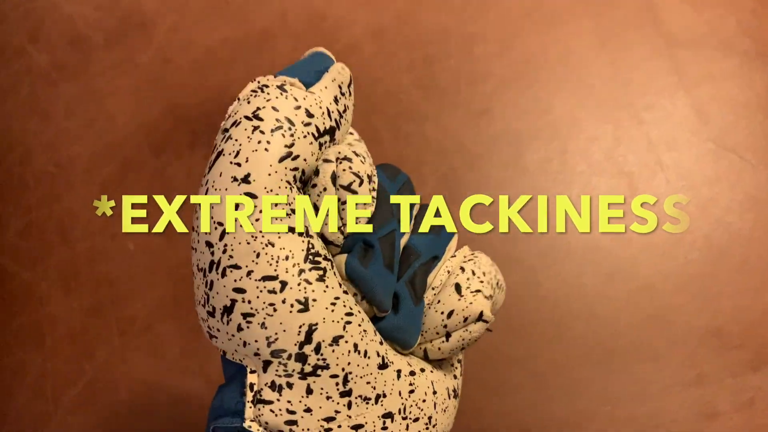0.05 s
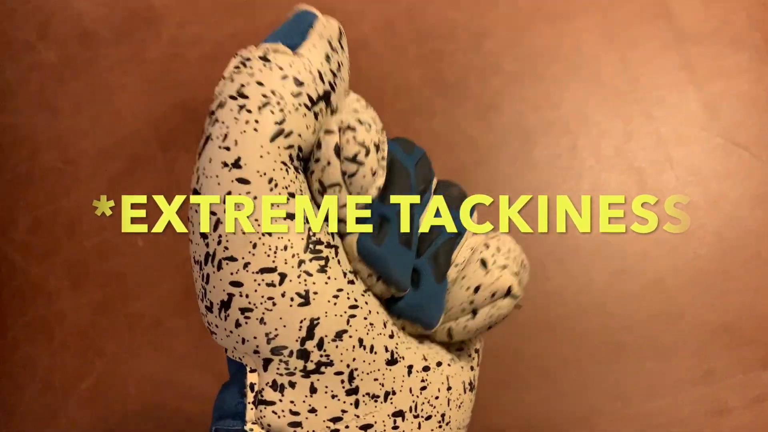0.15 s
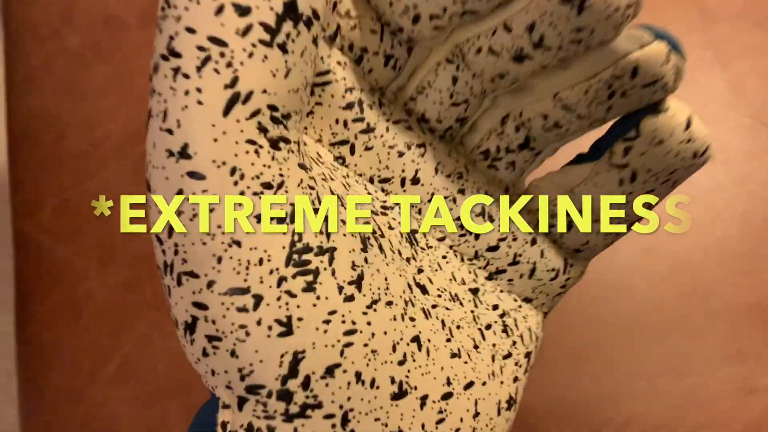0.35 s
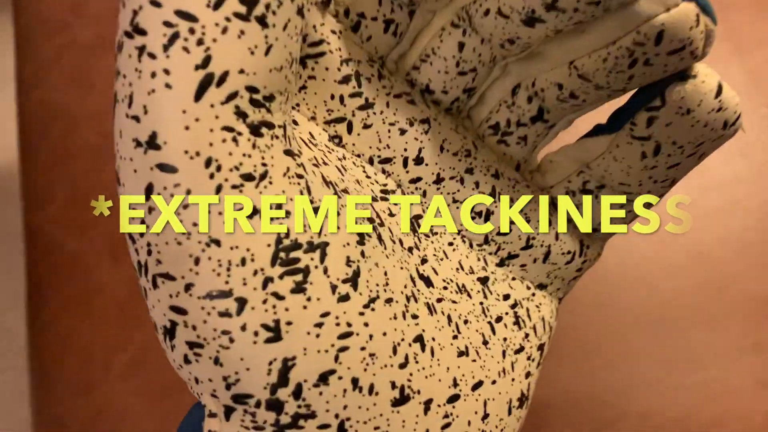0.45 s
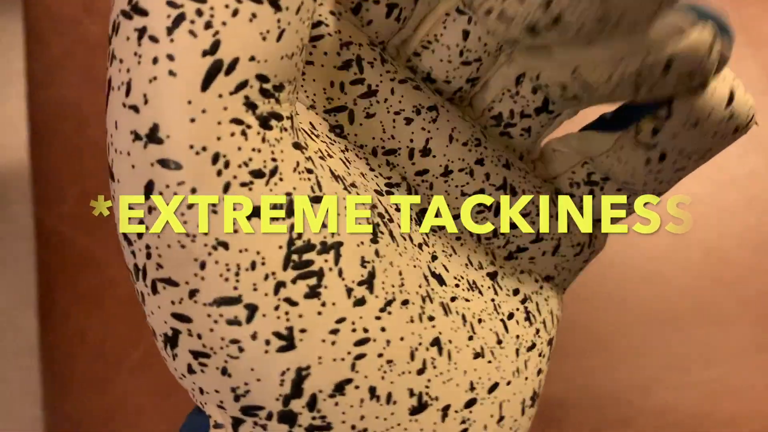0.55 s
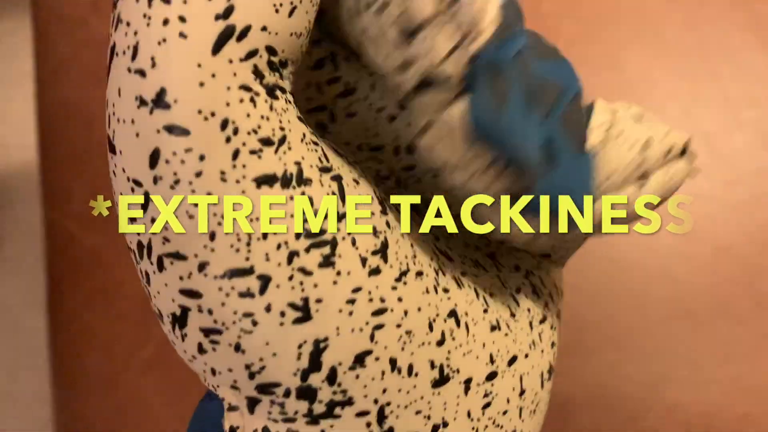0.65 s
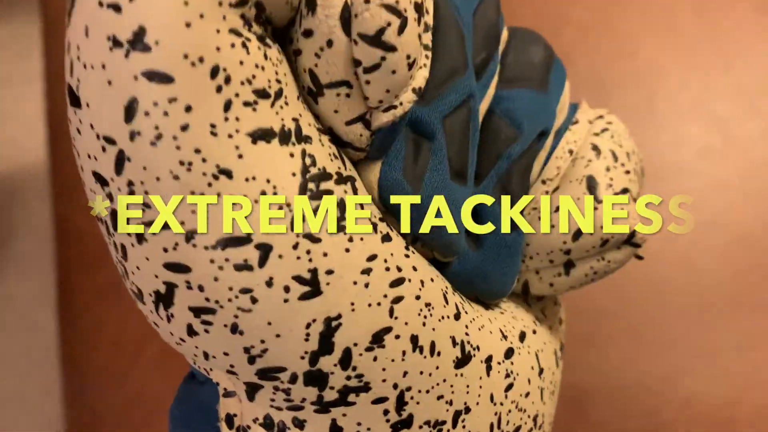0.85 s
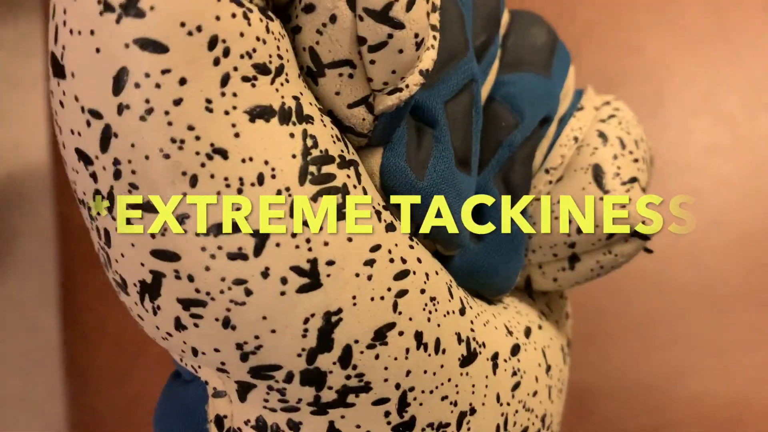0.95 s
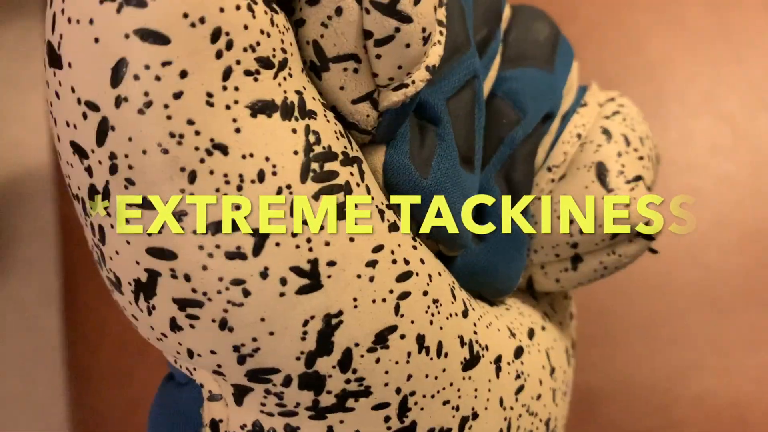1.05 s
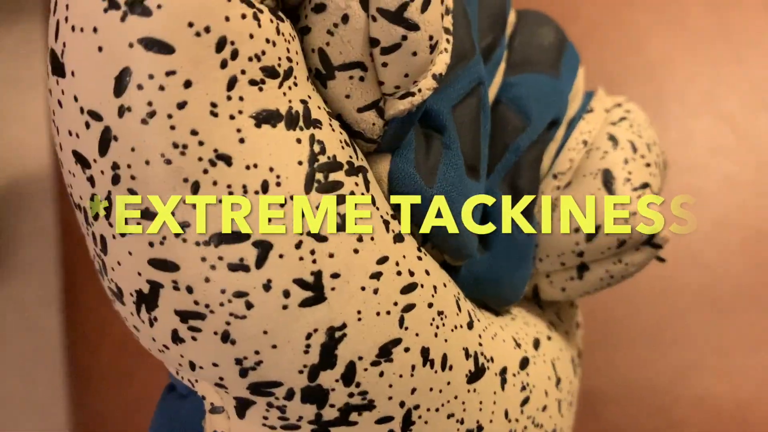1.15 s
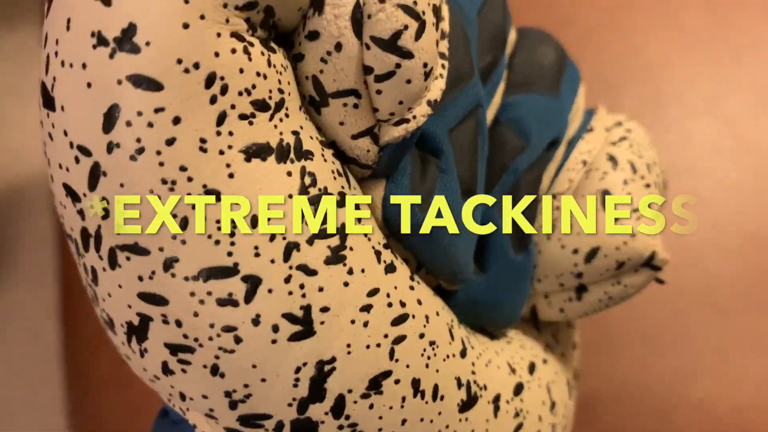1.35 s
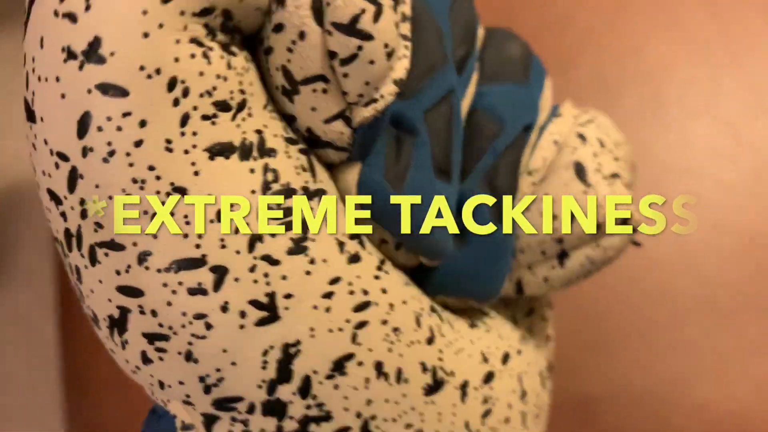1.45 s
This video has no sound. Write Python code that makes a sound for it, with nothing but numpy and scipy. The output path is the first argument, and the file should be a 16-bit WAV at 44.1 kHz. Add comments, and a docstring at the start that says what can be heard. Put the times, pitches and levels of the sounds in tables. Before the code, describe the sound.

Sticky crackling and tiny pops as a gloved hand opens, then closes with a faint rustle.

```python
"""A quiet room, with a pair of microphones close to a tacky latex glove that opens and closes.
The palm peels apart in a fine crackle of breaking bonds and ends in a run of snaps, while small
air pockets pop with a falling pitch. The fist closes with a soft rustle, ticks once while it is
held, and begins to peel again. Under it lie a low rumble from the hand, room hum and microphone hiss."""
import sys
import numpy as np
from scipy import signal
from scipy.fft import rfft, irfft
from scipy.io import wavfile

SR = 44100
rng = np.random.default_rng(int(sys.argv[2]) if len(sys.argv) > 2 else 0)


def bounce(signal):
    """Save signal as a 16-bit WAV file at the path given by the first command-line argument."""
    frames = np.transpose(np.atleast_2d(signal))
    limited = np.clip(frames, -1, 1)
    pcm = np.round(limited * 32767).astype(np.int16)
    wavfile.write(sys.argv[1], SR, pcm)


N = 66150
T = np.arange(N) / SR
FFT_SIZE = 2 * N
HZ = np.maximum(np.arange(N + 1) * SR / FFT_SIZE, 1)

# The three moves of the hand. Each row: time in seconds, rustle level in dB, fizz level in dB.
PALM_PEELS = [(0, -96, -85), (0.128, -78.5, -72), (0.159, -58, -61.5), (0.183, -46, -49),
              (0.201, -49.5, -46.5), (0.211, -35, -35.5), (0.231, -33.5, -41.5), (0.251, -41, -47.5),
              (.28, -49.5, -49.5), (0.304, -51.5, -54.5), (.335, -52.5, -55), (.355, -66.5, -65.5),
              (0.402, -56.5, -66.5), (0.439, -89, -86.5)]
FIST_CLOSES = [(.48, -78, -86), (0.504, -63.5, -67), (0.519, -51.5, -64), (.545, -68.5, -69.5),
               (.635, -58, -68), (0.748, -58.5, -60), (.81, -68.5, -71.5), (.88, -82.5, -71.5),
               (1.0, -99, -85)]
PALM_REOPENS = [(1.385, -83.5, -80), (1.413, -68, -68), (1.459, -62.5, -57), (1.476, -52, -54),
                (1.493, -44.5, -39), (1.5, -41.5, -42)]
# Tone of the dull rustle and the bright fizz. Each row: frequency in Hz, relative level in dB.
RUSTLE_SPECTRUM = [(60, -13), (200, -10), (420, -9), (600, -9.5), (850, -0.5), (1400, 1), (2400, -4),
                   (3000, -11), (5000, -25), (12000, -42)]
FIZZ_SPECTRUM = [(1200, -25), (3000, -1), (4600, 0.5), (6300, -2), (7400, 1), (8700, -1), (11000, -3),
                 (13200, -5.5), (14500, -15), (16000, -21)]
# Air pockets opening. Each row: start in seconds, peak in dB, first pitch in Hz,
# growth of the period in seconds per second, swell time in seconds.
AIR_POCKETS = [(0.1924, -36.5, 1536, .16, 0.0017), (.2125, -32, 863, .03, 0.0021),
               (.2203, -19.5, 1916, 0.078, 0.00051), (.2222, -15.5, 1450, 0.33, 0.00044),
               (0.2236, -26, 800, 0.44, 0.0047), (.2298, -25.5, 1000, .05, .0009),
               (0.2417, -17, 1350, 0.22, 0.00044), (0.259, -38, 1214, 0.013, 0.00067),
               (0.2962, -27.5, 2000, 0.41, 0.00058), (0.3654, -40, 2000, 0.13, 0.00029),
               (.367, -51, 545, 0.054, 0.0021), (0.5031, -47.5, 1000, 0.06, .001),
               (0.5241, -26.5, 1600, 0.61, 0.0011), (.6985, -44, 524, 0.3, 0.0028)]
# Tacky spots letting go. Each row: start in seconds, level in dB, decay in seconds,
# lower and upper band edge in Hz.
TACKY_SPOTS = [(.0468, -44.5, 0.00093, 1850, 16000), (0.1922, -29, 0.0013, 1090, 11700),
               (0.21, -49, 0.00038, 1400, 12430), (.2203, -20, .001, 1395, 12000),
               (.2210, -21, 0.0018, 1690, 2900), (.2220, -14.5, 0.00084, 4260, 13100),
               (.2260, -19.5, .0004, 4240, 13500), (0.2581, -28.5, .0009, 4300, 12700),
               (.269, -30.5, .0003, 2000, 12640), (0.2985, -38, 0.00083, 1110, 4850),
               (0.3263, -33.5, 0.0007, 2500, 14700), (0.3658, -42, 0.00046, 1390, 9050),
               (0.5236, -34, 0.00025, 1390, 8750), (1.1027, -24.5, 0.00017, 6700, 11800),
               (1.103, -46.5, 0.0016, 1180, 6500), (1.413, -49, 0.0011, 1200, 4000),
               (1.4746, -38.5, .0012, 1100, 9500)]
# Rumble of the moving hand. Each row: time in seconds, level in dB.
HAND_RUMBLE = [(.21, -80), (.245, -49.5), (.3, -54), (.35, -69), (.5, -68), (.56, -55.5), (.62, -65.5),
               (.68, -53.5), (0.768, -58.5), (.85, -69)]
# Phase across the pair. Each row: frequency in Hz, lead of the left microphone in radians.
LEFT_LEAD = [(200, 0.5), (1000, 1.23), (2200, -1.3), (3300, -2), (4300, -2), (5200, -3.5), (7500, 1.55),
             (9500, -1.99), (11500, 4), (13500, 2), (15200, 8)]
# Balance across the pair. Each row: frequency in Hz, left minus right in dB.
LEFT_BALANCE = [(60, 0), (200, -3), (600, -3), (1300, 0.5), (2500, -8), (5000, 1.5), (12000, -0.5)]
# Wavering drones of the room. Each row: centre in Hz, half-width in Hz, level in dB.
ROOM_DRONES = [(55.1, 6.7, -61.5), (176.4, 6.8, -66.5), (491, 25, -74)]
# Room tone and each microphone's own hiss. Each row: frequency in Hz, gain on white noise in dB.
ROOM_TONE = [(20, -69.5), (50, -39), (90, -42), (180, -48.5), (300, -54), (420, -67.5), (800, -81),
             (2000, -79), (5000, -69), (10000, -66.5), (16000, -70.5)]
MICROPHONE_HISS = [(20, -72.5), (60, -55.5), (200, -51.5), (450, -59.5), (900, -67.5), (1600, -63.5),
                   (3000, -71), (4300, -70), (8000, -85), (16000, -87)]


def latex_crackle():
    """Tiny bonds break as the hand flexes: a dull rustle from the foam, a bright fizz from its skin."""
    times, rustle_db, fizz_db = np.transpose(PALM_PEELS + FIST_CLOSES + PALM_REOPENS)
    rustle = rms_one(colour(breaking_bonds(), RUSTLE_SPECTRUM))
    fizz = rms_one(colour(breaking_bonds(), FIZZ_SPECTRUM))
    return from_db(np.interp(T, times, rustle_db)) * rustle + from_db(np.interp(T, times, fizz_db)) * fizz


def breaking_bonds(clicks_per_s=8000, spread_db=3, clump_db=2.5, clump_s=0.002):
    """The bond gives way in patches, so dense clicks of uneven size come in clumps."""
    sizes = from_db(spread_db * np.minimum(rng.exponential(1, N), 4.43))
    signs = rng.choice([-1, 1], N)
    breaks = rng.random(N) < clicks_per_s / SR
    clumps = np.interp(T / clump_s, np.arange(N), rng.standard_normal(N))
    return sizes * signs * breaks * from_db(clump_db * clumps)


def air_pops():
    """Each air pocket rings as it opens; its period grows steadily, so the pitch drops."""
    out = np.zeros(N)
    for start, db, hz, growth, swell_s in AIR_POCKETS:
        age = np.maximum(T - start, 0)
        cycles = np.log1p(growth * hz * age) / growth
        envelope = age / swell_s * np.exp(1 - age / swell_s)
        out += from_db(db) * envelope * np.sin(2 * np.pi * cycles)
    return out


def tacky_snaps():
    """Each sticky spot tears free in a burst about a millisecond long."""
    out = np.zeros(N)
    for start, db, decay_s, low_hz, high_hz in TACKY_SPOTS:
        decays = (T - start) / decay_s
        envelope = (decays >= 0) * (decays < 4.2) * np.exp(-np.abs(decays))
        burst = rng.choice([-1, 1], N) * envelope
        snap = band(band(burst, low_hz, high_hz), low_hz, high_hz)
        burst_energy = decay_s * SR / 2
        out += from_db(db) * snap * np.sqrt(burst_energy / np.sum(snap ** 2))
    return out


def hand_rumble():
    """The moving hand makes a soft low rumble close to the microphones."""
    times, db = np.transpose(HAND_RUMBLE)
    rumble = band(rng.standard_normal(N), low_hz=42.8, high_hz=96)
    return from_db(np.interp(T, times, db)) * rms_one(rumble)


def reflections(x, db, t60_s, delay_s, low_hz, high_hz):
    """A dying spray of reflections, different at each microphone."""
    envelope = from_db(-60 * T / t60_s) * (T >= delay_s)
    tail = band(rng.standard_normal((2, N)) * envelope, low_hz, high_hz)
    response = rfft(rms_one(tail) / np.sqrt(N), FFT_SIZE)
    return from_db(db) * filtered(x, response)


def room_hum():
    """The room drones in narrow, wavering bands of low noise."""
    out = np.zeros(N)
    for hz, half_width, db in ROOM_DRONES:
        peak = 1 / (1 + ((HZ - hz) / half_width) ** 2)
        out += from_db(db) * rms_one(filtered(rng.standard_normal(FFT_SIZE), peak))
    return out


def microphone_pair(x):
    """The close pair hears one sound, with its own phase and level on each side."""
    sides = np.array([[.5], [-.5]])
    gain = from_db(sides * over_hz(LEFT_BALANCE))
    phase = sides * over_hz(LEFT_LEAD)
    return filtered(x, gain * np.exp(1j * phase))


def from_db(db):
    """Decibels to gain."""
    return 10 ** (np.asarray(db) / 20)


def rms_one(x):
    """Scale to rms 1."""
    return x / np.sqrt(np.mean(x ** 2) + 1e-20)


def over_hz(points):
    """Read a table along log frequency."""
    hz, value = np.transpose(points)
    return np.interp(np.log(HZ), np.log(hz), value)


def filtered(x, response):
    """Apply a frequency response."""
    return irfft(rfft(x, FFT_SIZE) * response, FFT_SIZE)[..., :N]


def colour(x, spectrum):
    """Causal (minimum-phase) filter with the given spectrum."""
    cepstrum = irfft(np.log(from_db(over_hz(spectrum))))
    fold = np.r_[1, np.full(N - 1, 2), 1, np.zeros(N - 1)]
    return filtered(x, np.exp(rfft(cepstrum * fold)))


def band(x, low_hz, high_hz):
    """Band-pass between two edges."""
    return signal.sosfilt(signal.butter(2, [low_hz, high_hz], "band", fs=SR, output="sos"), x + 1e-18)


def scene():
    """The glove up close, its reflections off the fingers and the room, and the quiet behind it."""
    glove = latex_crackle() + air_pops() + tacky_snaps()
    fingers = reflections(glove, db=-12, t60_s=0.036, delay_s=0, low_hz=2040, high_hz=5400)
    room = reflections(glove, db=-21.5, t60_s=0.22, delay_s=0.0033, low_hz=100.2, high_hz=4000)
    background = colour(rng.standard_normal(N), ROOM_TONE) + room_hum()
    direct = microphone_pair(glove + hand_rumble() + background)
    hiss = colour(rng.standard_normal((2, N)), MICROPHONE_HISS)
    return direct + fingers + room + hiss


def record(dry):
    """The recorder cuts the top steeply."""
    cutoff_hz = 16300
    return signal.sosfilt(signal.ellip(10, .1, 80, cutoff_hz, fs=SR, output="sos"), dry)


dry = scene()
out = record(dry)
bounce(out)
```